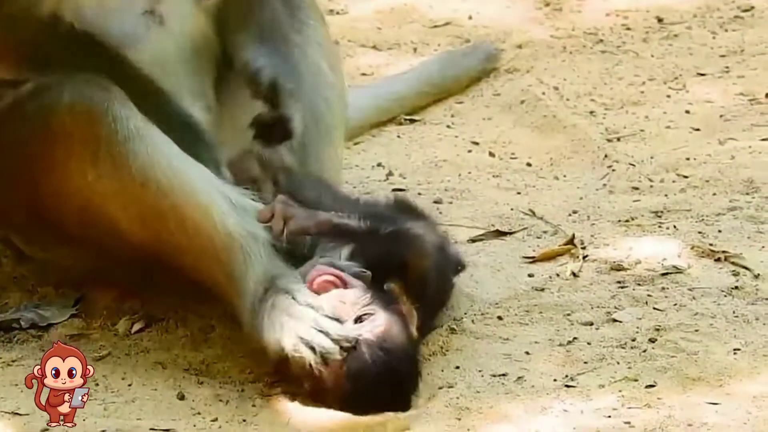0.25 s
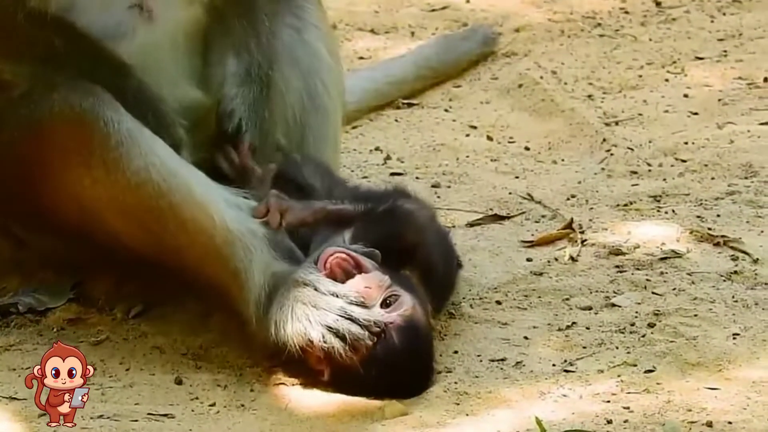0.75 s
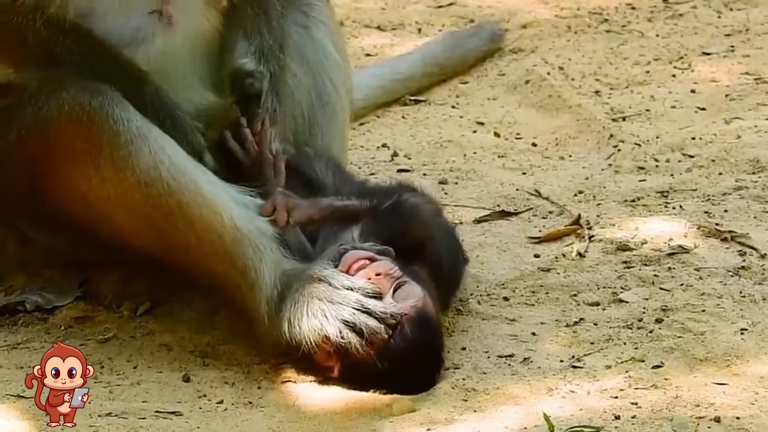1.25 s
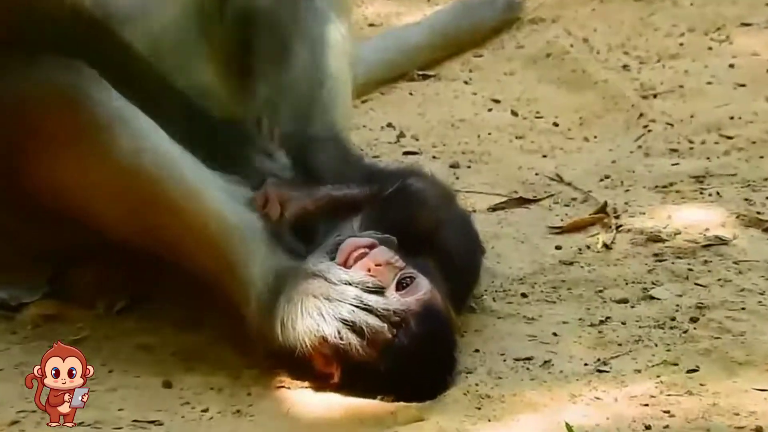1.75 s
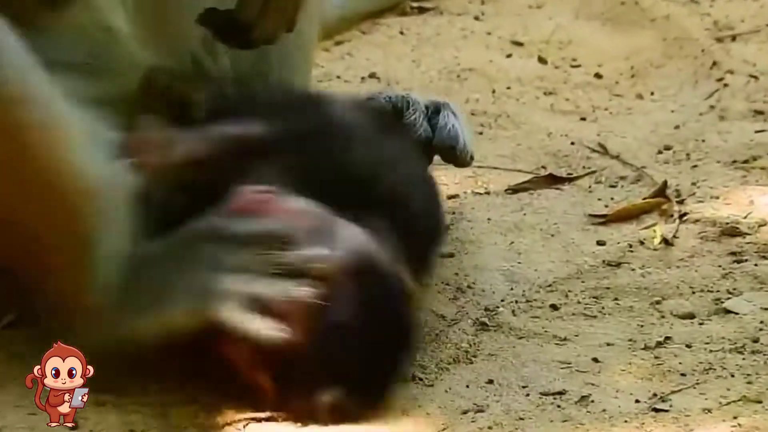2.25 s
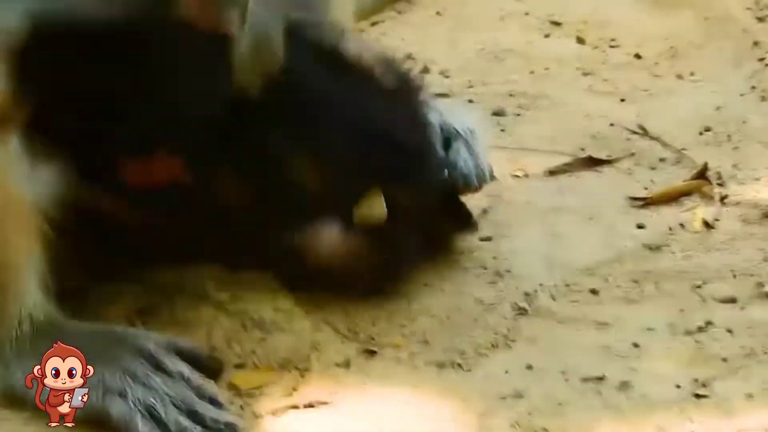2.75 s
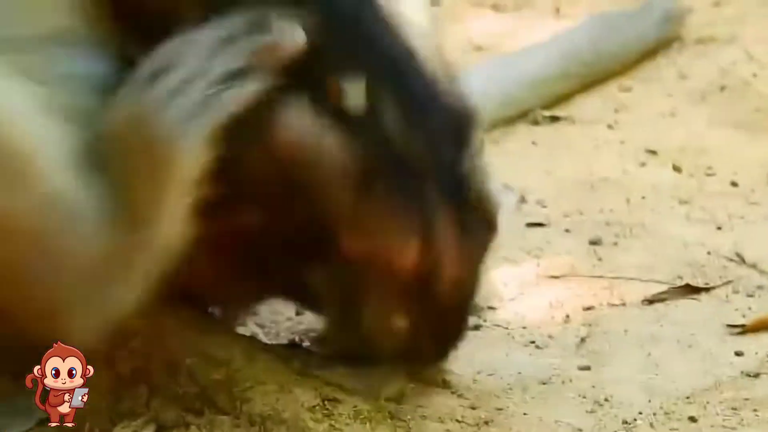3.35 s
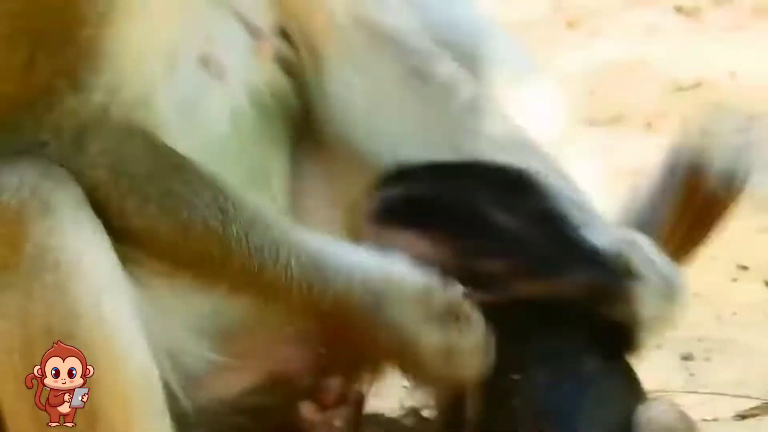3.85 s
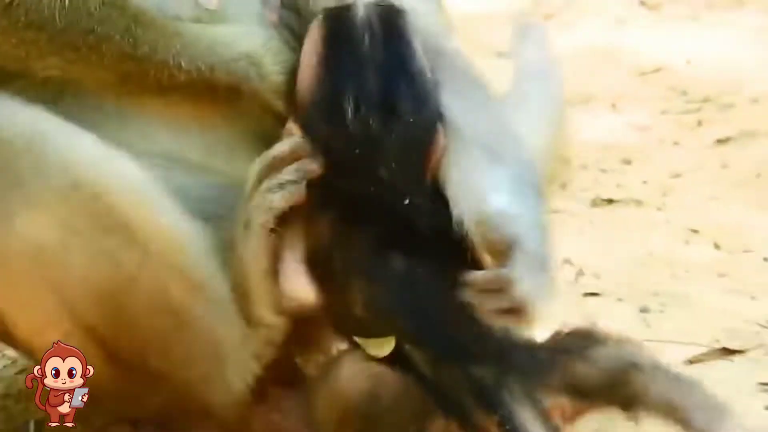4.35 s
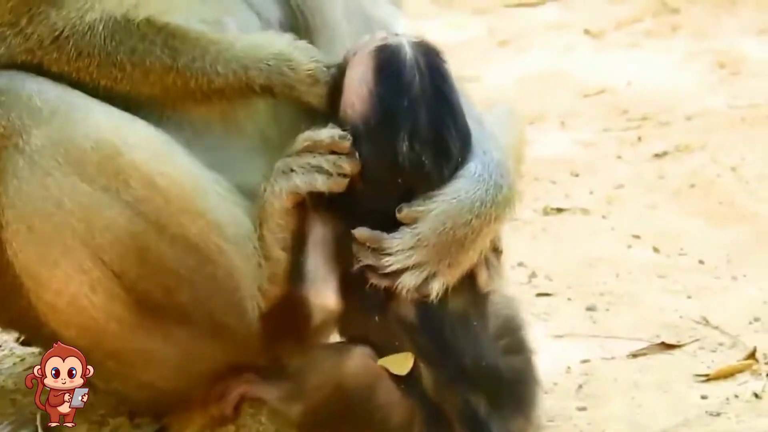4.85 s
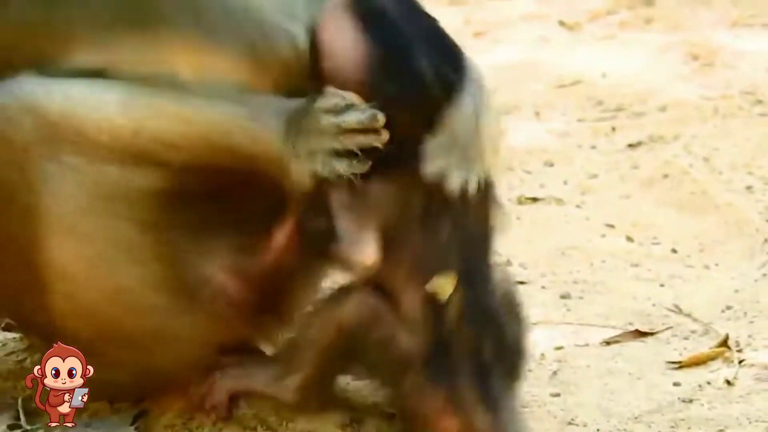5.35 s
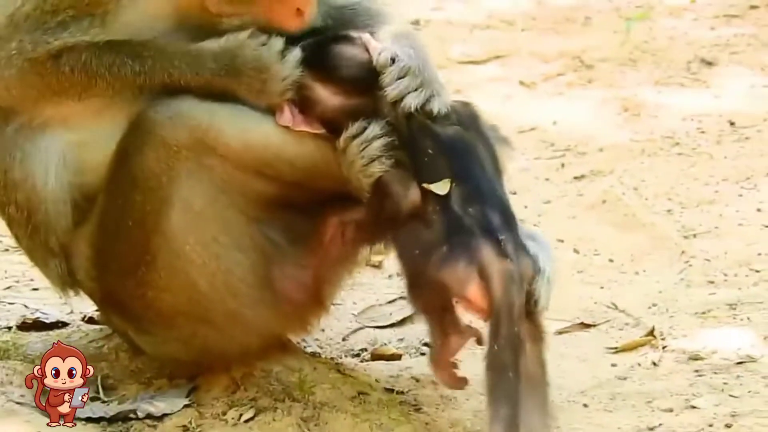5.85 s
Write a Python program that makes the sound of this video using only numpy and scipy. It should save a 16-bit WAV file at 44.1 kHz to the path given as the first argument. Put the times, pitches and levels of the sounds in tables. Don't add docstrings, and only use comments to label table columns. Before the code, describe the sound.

Shrill distress squeals of a young monkey come in quick broken bursts with gaps between, over grit ticks, dull thumps and fading distant rumble.

```python
import sys
import numpy as np
from scipy import signal
from scipy.io import wavfile
from scipy.ndimage import uniform_filter1d

SR = 44100
rng = np.random.default_rng(int(sys.argv[2]) if len(sys.argv) > 2 else 0)


def attenuation_scalar(level_db):
    decades = np.asarray(level_db, float) / 20
    return 10 ** decades


def wav_out(sig):
    wavfile.write(sys.argv[1], SR, np.round(np.clip(np.atleast_2d(sig).T, -1, 1) * 32767).astype(np.int16))


N = 268569
TIME = np.arange(N) / SR


def at_hz(points, hz):
    points = np.array(points)
    return np.interp(np.log(hz), np.log(points[:, 0]), points[:, 1])


def rms_one(x):
    return x / np.sqrt(np.mean(x ** 2) + 1e-20)


def drift(hz, size=N):
    r = np.exp(-2 * np.pi * hz / SR)
    white = rng.standard_normal(size + 20000)
    return rms_one(signal.lfilter([1], [1, -2 * r, r * r], white)[20000:])


def band(x, low_hz, high_hz, order=2):
    return signal.sosfilt(signal.butter(order, [low_hz, high_hz], "band", fs=SR, output="sos"), x)


def stretch(rows, fade_s=0.0046):
    s, *columns = np.transpose(rows)
    at = slice(max(int((s[0] - fade_s) * SR), 0), int((s[-1] + fade_s) * SR))
    gate = np.interp(TIME[at], [s[0] - fade_s, s[0], s[-1], s[-1] + fade_s], [0, 1, 1, 0]) ** 2
    return at, gate, [np.interp(TIME[at], s, c) for c in columns]


def swell(start_s, hold_s, level_db, rise_db_per_s, fall_db_per_s):
    t = TIME[::32]
    early_s = np.maximum(start_s - t, 0)
    late_s = np.maximum(t - start_s - hold_s, 0)
    return np.interp(TIME, t, attenuation_scalar(level_db - rise_db_per_s * early_s - fall_db_per_s * late_s))


def glide(start_s, length_s, first_hz, last_hz, level_db):
    middle_hz = first_hz + .4 * (last_hz - first_hz)
    return [(start_s, first_hz, level_db - 3),
            (start_s + length_s / 2, middle_hz, level_db),
            (start_s + length_s, last_hz, level_db - 3)]


def tone(hz, jitter, shimmer_db):
    phase = 2 * np.pi * np.cumsum(hz * (1 + jitter * drift(157, size=len(hz)))) / SR
    return phase, np.sqrt(2) * rms_one(attenuation_scalar(shimmer_db * drift(90, size=len(hz))))


def whistle():
    # time in seconds, pitch in Hz, effort in dB.
    pinned = [
        [(.11, 4950, -26), (.122, 5190, -16), (.134, 6280, -2.5), (.146, 8130, -5), (.158, 9600, -2),
         (.17, 10500, -10)],
        [(.157, 10800, -0.5), (.175, 12040, 0), (.2, 13280, -3), (.235, 13730, 2.5), (.27, 13450, 0),
         (.322, 13250, 2.5), (.331, 9520, -1), (.341, 6320, 9)],
        [(.747, 5460, -5.5), (.77, 6110, 10), (.79, 6790, 0), (.81, 8060, 2), (.835, 9500, -4)],
        [(.808, 9200, -2), (.83, 11020, 11), (.855, 11880, -2), (.9, 11550, -6.5), (.92, 12110, -3),
         (.948, 11520, -4)],
        [(.955, 12260, -1.5), (1.06, 12360, 2), (1.08, 11430, 5), (1.105, 11750, 4), (1.12, 11170, 1),
         (1.135, 7180, 6), (1.145, 4460, -21.5)],
        [(2.115, 5840, 0), (2.13, 6830, 0), (2.145, 8420, -12), (2.158, 9000, 4), (2.172, 10900, 3.5),
         (2.185, 11500, -2)],
        [(2.172, 12000, -12), (2.19, 12800, -10), (2.215, 12400, -6), (2.245, 11700, -0.5),
         (2.275, 11960, -2.5), (2.348, 11470, 2), (2.358, 9700, -11)],
    ]
    rolled = [
        [(2.492, 6700, -21.5), (2.505, 10500, -2.5), (2.525, 12030, -9), (2.565, 11620, -10), (2.61, 10400, -6)],
        [(2.84, 12580, -9), (2.875, 12400, -12), (2.89, 13000, -12), (2.915, 11850, 1), (2.935, 12800, -30),
         (2.96, 12600, -4), (2.98, 14000, 0)],
    ]
    lifted = [
        [(3.407, 6980, -3.5), (3.43, 7120, -21), (3.445, 7820, -6), (3.457, 9300, -21)],
        [(3.455, 11150, -8), (3.47, 11000, -12), (3.484, 12930, -12), (3.495, 13270, -10), (3.525, 13270, -11),
         (3.54, 11000, -6.5), (3.552, 8950, -7)],
        [(3.825, 7120, -23), (3.838, 10740, -5.5), (3.87, 13450, -4), (3.935, 12170, -13.5),
         (4.052, 12960, -19), (4.07, 12200, -18.5), (4.15, 11670, -8), (4.215, 12260, -8), (4.24, 6740, -20)],
        [(4.462, 4260, -45), (4.476, 4870, -21), (4.488, 5690, 8), (4.5, 6250, -2), (4.52, 6470, -4.5),
         (4.536, 7440, 2.5), (4.548, 7630, 11), (4.562, 8150, 16.5), (4.574, 8330, -6)],
        [(4.568, 8850, 0), (4.584, 9000, 10), (4.596, 8900, 4.5), (4.608, 8330, 2.5), (4.62, 7840, 15.5),
         (4.634, 7130, -16)],
    ]
    # pitch in Hz, gain in dB.
    carry = [(4500, -2.5), (5500, -16), (6500, -5.5), (8000, -13.5), (9000, -18.5), (11000, -27),
             (12200, -26.5), (13500, -33)]
    # start in seconds, hold in seconds, level in dB.
    half_pitch = [(0.191, 0.017, -22), (0.243, 0.071, -26), (0.885, 0.021, -19.5), (0.93, 0.025, -18.5),
                  (2.264, 0.082, -34), (2.54, 0.031, -26), (2.852, 0.044, -25.5), (3.426, 0.011, -29.5),
                  (3.844, 0.053, -35), (3.945, 0.04, -35.5), (4.007, .03, -27), (4.055, 0.13, -19),
                  (4.242, 0.016, -15.5), (4.573, 0.028, -20)]

    out = np.zeros(N)
    halving = attenuation_scalar(-52) + sum(swell(*row, rise_db_per_s=1498, fall_db_per_s=1202) for row in half_pitch)
    for rows in pinned + rolled + lifted:
        at, gate, (hz, effort_db) = stretch(rows)
        n = len(hz)
        hz = uniform_filter1d(hz, size=441, mode="nearest") * (1 + .005 * drift(22, size=n))
        level_db = effort_db + at_hz(carry, hz)
        phase, height = tone(hz, jitter=0.002, shimmer_db=1.8)

        loose = 1 + 14.0 / (1 + (halving[at] / attenuation_scalar(-27)) ** 4)
        shake_rad = 0.11 * loose * drift(210, size=n)
        half_gain = halving[at] * attenuation_scalar(1.3 * np.sqrt(loose) * drift(79, size=n))
        half = half_gain * np.sqrt(2) * np.sin(phase / 2 + shake_rad)

        collapse = np.clip(-np.gradient(hz) * SR / 250000, 0, 1.5)
        breathy = 1 + (attenuation_scalar(-27.0) + collapse) * drift(700, size=n)
        beat_gain = attenuation_scalar(-21 + 6.0 * drift(14, size=n)) * (hz > 11000)
        beat = beat_gain * np.sin(.72 * phase + 2 * shake_rad)
        overtone = attenuation_scalar(-43) * np.sin(2 * phase) * (hz < 6800)
        voice = breathy * np.sin(phase) + overtone + beat
        out[at] += gate * (attenuation_scalar(level_db) * height * voice + half)
    return out


def strands(curves, grit_share):
    out = np.zeros(N)
    for rows in curves:
        at, gate, (hz, level_db) = stretch(rows)
        smooth_hz = uniform_filter1d(hz, size=221, mode="nearest")
        phase, height = tone(smooth_hz, jitter=.025 * grit_share, shimmer_db=1.5)
        grit = 1 + grit_share * drift(380, size=len(hz)) * (hz > 1400)
        overtone = attenuation_scalar(-18.0) * np.sin(2 * phase) * (hz < 3200)
        out[at] += gate * attenuation_scalar(level_db) * height * grit * (np.sin(phase) + overtone)
    return out


def second_voice():
    # time in seconds, pitch in
    # Hz, level in dB.
    screams = [
        [(3.522, 3770, -32), (3.532, 3500, -11.5), (3.545, 2762, -27.5), (3.555, 3450, -20), (3.568, 3870, -6),
         (3.585, 3650, -18), (3.6, 3167, -16), (3.62, 3460, -15.5), (3.638, 2910, -25)],
        [(3.54, 7130, -19), (3.555, 5880, -7.5), (3.58, 5750, -14), (3.6, 5370, -23)],
        [(4.44, 1630, -27.5), (4.452, 2040, -28), (4.464, 2810, -33.5), (4.476, 3880, -31), (4.488, 5140, -21),
         (4.5, 5370, -27), (4.512, 5360, -18.5), (4.524, 5950, -20)],
        [(5.595, 4600, -26), (5.606, 4660, -12), (5.618, 5290, -16), (5.63, 6180, -19), (5.636, 6690, -28),
         (5.643, 6750, -10), (5.655, 6950, -22)],
        [(5.68, 6760, -9.5), (5.708, 6600, -10), (5.726, 6100, -19), (5.732, 6800, -22), (5.75, 6500, -18),
         (5.775, 6510, -22)],
        [(5.698, 5150, -13), (5.708, 5000, -7), (5.72, 4700, -6.5), (5.745, 4415, -17.5), (5.76, 4287, -10),
         (5.778, 4140, -30)],
    ]
    # start in seconds, length in seconds, first pitch in Hz, last pitch in Hz, level in dB.
    glides = [(0.053, 0.032, 5570, 6600, -33), (0.095, 0.019, 3214, 3504, -22.5),
              (0.104, 0.02, 6500, 6860, -11), (0.756, 0.06, 1885, 3910, -36.5),
              (2.071, 0.015, 5050, 6730, -23.5), (2.093, 0.022, 3405, 3590, -26),
              (2.632, 0.038, 7520, 7680, -33.5), (2.639, 0.052, 11540, 11100, -34.5),
              (2.971, 0.027, 3370, 4220, -25.5), (2.978, 0.019, 793, 677, -28.5),
              (3.43, 0.014, 5030, 5600, -30), (3.445, 0.015, 4850, 5450, -22),
              (3.443, 0.013, 6420, 7440, -13), (4.04, 0.17, 2350, 1895, -51.5),
              (4.49, 0.095, 2460, 4380, -40), (4.568, 0.052, 6730, 6710, -3.5),
              (4.572, 0.045, 2850, 2880, -40), (4.44, 0.025, 2330, 2400, -32),
              (3.623, .015, 6730, 6370, -22), (5.549, 0.024, 3900, 3750, -23),
              (5.703, 0.016, 8600, 7740, -24.5)]
    frayed = [(.05, .04, 3100, 2950, -38.5), (4.624, 0.022, 4500, 4200, -14.5),
              (4.626, .034, 4030, 3255, -13), (5.562, 0.034, 3250, 3250, -29.5),
              (.2, 0.011, 7600, 7600, -29.5), (.345, 0.027, 4300, 4900, -13.5),
              (1.14, 0.043, 4600, 4500, -21.5), (4.185, 0.018, 6900, 6900, -28),
              (.074, 0.015, 5730, 5660, -34), (.075, 0.0091, 6600, 6740, -23),
              (0.973, 0.066, 9200, 9240, -37.5), (1.066, .045, 8860, 8560, -31.5),
              (2.133, 0.03, 6780, 6500, -22), (2.162, 0.016, 8700, 8940, -31),
              (3.412, 0.023, 6100, 6500, -40), (3.437, 0.015, 3210, 3500, -27.5),
              (4.449, 0.016, 7030, 7170, -30), (4.479, .026, 5770, 6650, -17),
              (5.513, .03, 3320, 3270, -38), (1.383, .12, 5300, 6020, -47),
              (1.948, 0.097, 4000, 4020, -50.5), (5.527, 0.015, 5310, 5540, -27),
              (5.528, .024, 6870, 7150, -30), (5.554, 0.019, 6240, 7050, -19),
              (5.569, 0.031, 4250, 5200, -30), (5.6, .022, 5500, 6470, -22.5),
              (5.679, .02, 4980, 5020, -30), (.096, .02, 5620, 6400, -30), (.112, .025, 3900, 4790, -27.5),
              (5.597, .014, 6900, 6660, -35), (5.6, 0.058, 7600, 11300, -27), (5.66, .04, 11720, 9460, -31)]
    clean = strands(screams + [glide(*row) for row in glides], grit_share=.22)
    return clean + strands([glide(*row) for row in frayed], grit_share=.65)


def creak():
    # time in seconds, pitch in Hz, level in dB, brightness in dB per octave.
    slack = [
        (2.59, 1592, -44, 6),
        (2.626, 1490, -55, 4.5),
        (2.67, 1435, -47, -3),
        (2.7, 1331, -42, 3),
        (2.722, 1275, -44.5, 3.5),
        (2.76, 1287, -47, 3.5),
        (2.805, 1414, -41.5, 1.5),
        (2.825, 1566, -47.5, 6),
        (2.84, 1666, -49, 6.5),
    ]
    # frequency in Hz, gain in dB.
    colour = [(1300, 0), (2700, -8), (4000, 0), (5500, -2), (7500, -10), (12000, -17), (15000, -29)]
    out = np.zeros(N)
    at, gate, (hz, level_db, bright_db) = stretch(slack)
    n = len(hz)
    phase, height = tone(uniform_filter1d(hz, size=441, mode="nearest"), jitter=.0045, shimmer_db=2.5)
    ladder = 0
    for k in range(1, 12):
        overtone_db = at_hz(colour, k * hz) + bright_db * np.log2(k) + 5.0 * drift(30, size=n)
        ladder = ladder + attenuation_scalar(overtone_db) * np.sin(k * phase) * (k * hz < 15000)
    veil = 1 + (.55 + .4 * (hz > 1430)) * drift(500, size=n)
    out[at] = gate * attenuation_scalar(level_db) * height * rms_one(veil) * ladder
    return out


def resonance(x, hz, width_hz, level_db):
    r = np.exp(-np.pi * width_hz / SR)
    b = (1 - r * r) / 2 * np.array([1, 0, -1])
    a = [1, -2 * r * np.cos(2 * np.pi * hz / SR), r * r]
    return attenuation_scalar(level_db) * signal.lfilter(b, a, signal.lfilter(b, a, x))


def rasp():
    # centre in Hz, width in Hz, level in dB.
    mouth_modes = [(6730, 930, 13.5), (5930, 1230, 11.5), (7600, 710, 2.5)]
    throat_modes = [(4600, 1070, 12.5), (3190, 470, -2)]
    # time in seconds, level in dB.
    lip_opening = [(.11, -21), (.16, -15), (.3, -17), (.8, -17), (1.15, -24), (2.1, -21), (2.6, -6),
                   (3.0, -17), (3.44, -17), (3.6, -15), (3.85, -17), (4.24, -26), (4.45, -14), (4.52, -25),
                   (4.65, -42), (5.53, -24), (5.62, -11), (5.72, -19.5)]
    # start in seconds, length in seconds, effort in dB, throat share in dB.
    leaks = [
        (.045, 0.42, -38.5, -5),
        (.76, 0.52, -35, -3.5),
        (2.06, 0.3, -33, -8),
        (2.485, 0.28, -36.5, -9),
        (3.41, 0.21, -37.5, -22),
        (3.81, 0.524, -42, -11),
        (4.44, 0.41, -54, 2),
        (5.41, 0.46, -44.5, -8),
    ]
    # start in seconds, hold in seconds, effort in dB, throat share in dB.
    breaks = [(.085, .0, -17.5, -11), (.108, 0.024, -7.5, -11), (.21, 0.0079, -15.5, -16),
              (.345, 0.01, -8, 3.5), (.372, 0.02, -22, 13), (.78, 0.02, -13.5, -36.5), (.97, 0, -23.5, -19),
              (1.14, 0.016, -1, -4.5), (1.175, 0.0066, -18, 2), (2.13, 0, -9.5, -13.5),
              (2.23, 0.13, -37, -3.5), (2.535, 0.095, -39, 2.5), (2.68, 0, -27, -8), (2.85, 0.097, -27, -6),
              (2.99, 0, -10, -4.5), (3.435, 0.0063, -12.5, -5.5), (3.55, 0.0022, -1.5, -9),
              (3.59, 0.04, -26, 11.5), (3.905, 0.11, -37, -1), (4.19, 0.013, -21.5, -32.5),
              (4.235, 0.0015, -21, -2.5), (4.452, 0.017, -28, -3), (4.5, .03, -26, -3.5),
              (4.56, 0.029, -35, 0), (4.62, 0.051, -11.5, -0.5), (5.535, 0.0057, -18.5, -14),
              (5.56, 0.0077, -14.5, -7), (5.605, 0.0028, -6, -1.5), (5.645, 0, -16, -12),
              (5.69, 0.015, -5, -7), (5.72, 0.054, -27, -20)]
    shared_db = 1.5 * drift(110)

    def flow():
        return rng.standard_normal(N) * attenuation_scalar(shared_db + 3.5 * drift(35))

    mouth = rms_one(band(sum(resonance(flow(), *mode) for mode in mouth_modes), 2300, 13000))
    throat = rms_one(band(sum(resonance(flow(), *mode) for mode in throat_modes), 3000, 7000))
    lips = rms_one(band(flow(), 7100, 10500, order=4) + attenuation_scalar(-1.5) * band(flow(), 10000, 12500, order=4))
    lips = lips * attenuation_scalar(np.interp(TIME, *np.transpose(lip_opening)))
    chest = rms_one(band(flow(), 920, 2900))

    out = np.zeros(N)
    for rows, rise_db_per_s in [(leaks, 903), (breaks, 1404)]:
        for start_s, hold_s, effort_db, throat_db in rows:
            gain = swell(start_s, hold_s, effort_db - 5.0, rise_db_per_s, fall_db_per_s=745)
            out += gain * (mouth + attenuation_scalar(throat_db) * throat + lips + attenuation_scalar(-27) * chest)
    return out


def thumps():
    # start in seconds, peak in dB.
    pushes = [
        (1.691, -5),
        (2.976, -20),
        (4.218, -14),
        (5.46, -11),
        (5.689, -11),
    ]
    out, age = np.zeros(N), np.arange(int(.04 * SR)) / SR
    push = np.sin(2 * np.pi * 95 * age) * np.exp(-age / 0.0018)
    for start_s, peak_db in pushes:
        out[int(start_s * SR):][:len(age)] += attenuation_scalar(peak_db - 5.5) * push
    return out


def ticks():
    # start in seconds, peak in dB, centre in Hz.
    grains = [(.056, -31, 6000), (1.673, -33, 5000), (4.233, -21.5, 4500), (5.518, -26, 1500),
              (1.688, -28.5, 6400), (2.0318, -33, 4500), (2.692, -36, 4860), (3.157, -28.5, 7100),
              (3.285, -33, 4600), (4.41, -27, 2320), (4.419, -28.5, 7000), (5.014, -28, 6670),
              (5.415, -38, 5340), (5.44, -32, 2830), (6.021, -31.5, 2020), (6.035, -34, 6200)]
    out, age = np.zeros(N), np.arange(int(.04 * SR)) / SR
    for start_s, peak_db, hz in grains:
        burst = rng.standard_normal(len(age)) * np.exp(-age / 0.0053)
        burst = band(burst, hz * 0.39, min(hz * 1.17, 15000), order=4)
        out[int(start_s * SR):][:len(age)] += attenuation_scalar(peak_db) * burst / np.abs(burst).max()
    return out


def far_bird():
    # start in seconds, length in seconds, first pitch in Hz, last pitch in Hz, level in dB.
    hoots = [
        (1.808, 0.046, 1148, 1060, -34.5),
        (1.877, 0.0364, 1020, 1244, -38.5),
    ]
    return strands([glide(*row) for row in hoots], grit_share=.22)


def echoes(x):
    bright, out = band(x, 6500, 15000), np.zeros((2, N))
    for side, late_s, gain_db in [(0, 0.0034, 3.5), (1, 0.0026, 5.0), (0, 0.019, -16.0), (1, 0.006, -6.5)]:
        lag = int(late_s * SR)
        gain = (-1) ** side * attenuation_scalar(gain_db + 3.7 * drift(7))
        out[side, lag:] += gain[lag:] * bright[:-lag]
    return out


def trees(x, t60_s, bright_t60_s, early_db):
    age = np.arange(int(.7 * SR)) / SR
    grit = rng.standard_normal((2, 2, len(age))) * (1 - np.exp(-age / 0.001))
    tail = band(grit[0], 330, 5780) * attenuation_scalar(-60 * age / t60_s)
    tail = tail + attenuation_scalar(3.5) * band(grit[1], 7400, 11960) * attenuation_scalar(-60 * age / bright_t60_s)
    tail = tail * (1 + attenuation_scalar(early_db) * np.exp(-age / 0.012))
    tail = tail + 0.3 * tail[::-1]
    x = x * (.65 + .75 * drift(350))
    return signal.fftconvolve(x[None], tail / np.sqrt(np.sum(tail ** 2) / 2), axes=1)[:, :N]


def banded_noise(spectrum, low_hz, count, patchy_db):
    # frequency in Hz, correlation from 0 to 1.
    likeness = [(60, 0.96), (250, 0.99), (500, 0.96), (1500, 0.79), (5000, 0.34), (12000, 0.1)]
    out, together = 0, drift(6)
    edges_hz = low_hz * 2 ** (np.arange(count + 1) / 3)
    white = rng.standard_normal((2, 2, N))
    for k, (low, high) in enumerate(zip(edges_hz, edges_hz[1:])):
        centre_hz = np.sqrt(low * high)
        mid, side = band(white[k % 2], low, min(high, .45 * SR))
        alike = np.clip(at_hz(likeness, centre_hz), 0, 1)
        gain = attenuation_scalar(at_hz(spectrum, centre_hz) + patchy_db * (1.6 * together + drift(8.3)))
        out = out + gain * (np.sqrt(1 + alike) * mid + np.sqrt(1 - alike) * side * [[1], [-1]])
    return rms_one(out)


def distance():
    # time in seconds, rumble level in dB, hiss level in dB.
    levels = [(0, -31, -41), (.45, -34, -46), (1.5, -36.5, -47), (1.9, -37, -46.5), (4.3, -39, -53.5),
              (5.2, -41.5, -54), (6.09, -42.5, -51.5)]
    # frequency in Hz, density in dB per Hz.
    rumble_spectrum = [(15, -65.5), (25, -23), (55, -5), (114, -1), (186, -4), (217, 4.5), (292, -16),
                       (330, -3), (366, -31), (509, -4.5), (719, -18), (900, -12.5), (1170, -47),
                       (1980, -120)]
    hiss_spectrum = [(410, -35), (700, -5), (776, -12), (1120, -2.5), (1230, -6.5), (2830, -17.5),
                     (3020, -16), (3850, -14.5), (6690, -12.5), (8000, -24), (15000, -43)]
    s, rumble_db, hiss_db = np.transpose(levels)
    rumble = banded_noise(rumble_spectrum, 22, count=16, patchy_db=.7)
    hiss = banded_noise(hiss_spectrum, 880, count=13, patchy_db=.9)
    return attenuation_scalar(np.interp(TIME, s, rumble_db) + 2.5) * rumble + attenuation_scalar(np.interp(TIME, s, hiss_db) + 4.0) * hiss


def scene():
    near = whistle() + second_voice() + creak() + rasp() + thumps() + ticks() + far_bird()
    lean_db = -.45 + .4 * drift(5)
    out = near * attenuation_scalar(np.array([lean_db, -lean_db])) + attenuation_scalar(-10.0) * echoes(near)
    out = out + attenuation_scalar(-8.0) * trees(near, t60_s=0.65, bright_t60_s=.27, early_db=17.5)
    return out + distance()


def top_cut(x):
    return signal.sosfilt(signal.butter(12, 15770, fs=SR, output="sos"), x)


def record(dry):
    level_db = 10 * np.log10(uniform_filter1d(np.mean(dry ** 2, axis=0), size=256) + 1e-12)
    ramp_db = 220 * TIME
    held_db = np.maximum.accumulate(level_db + ramp_db) - ramp_db
    duck_db = uniform_filter1d(-.55 * np.maximum(held_db + 14.0, 0), size=128)
    ducked = dry * attenuation_scalar(duck_db)
    rounded = ducked / (1 + (ducked / .88) ** 6) ** (1 / 6)
    mix = signal.sosfilt(signal.ellip(10, .5, 70, 15650, fs=SR, output="sos"), rounded)
    return top_cut(mix)


dry = scene()
out = record(dry)
wav_out(out)
```